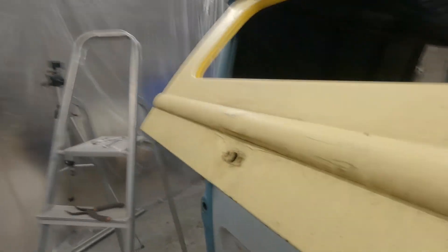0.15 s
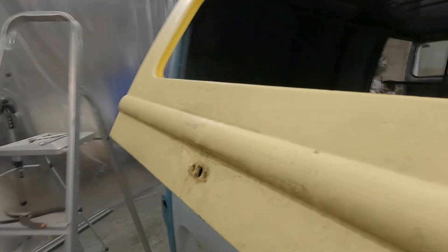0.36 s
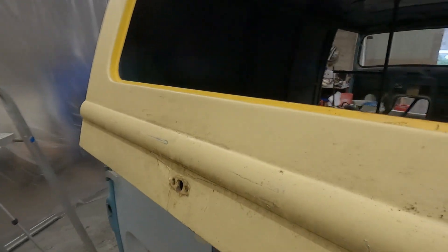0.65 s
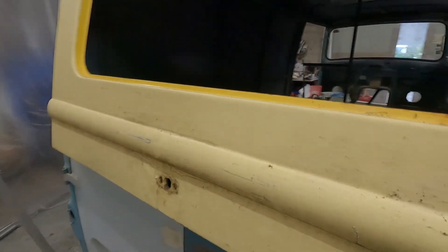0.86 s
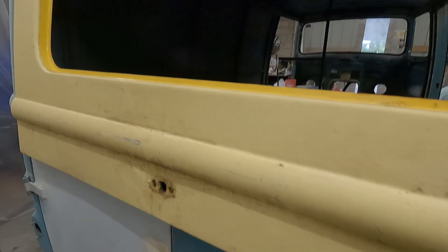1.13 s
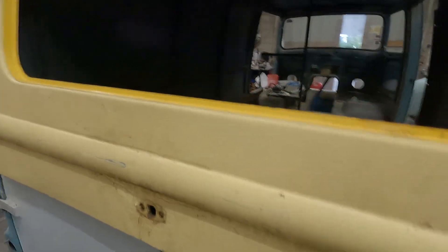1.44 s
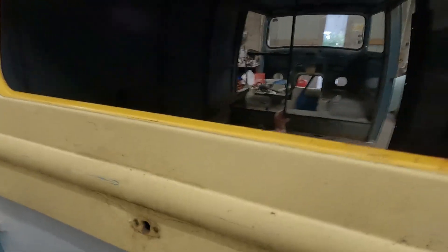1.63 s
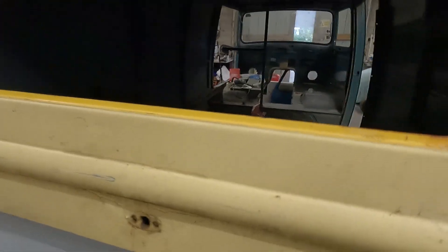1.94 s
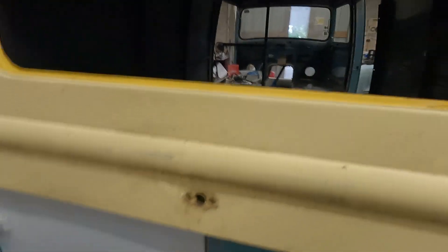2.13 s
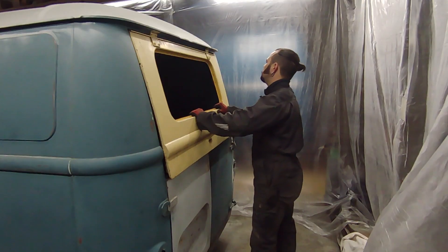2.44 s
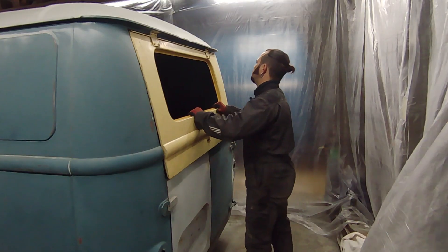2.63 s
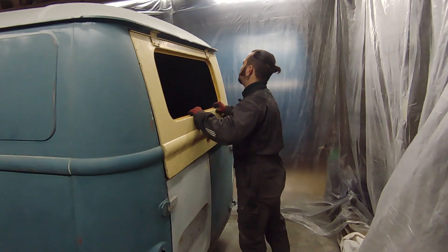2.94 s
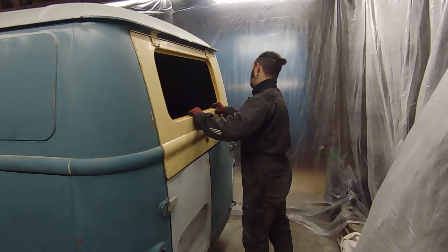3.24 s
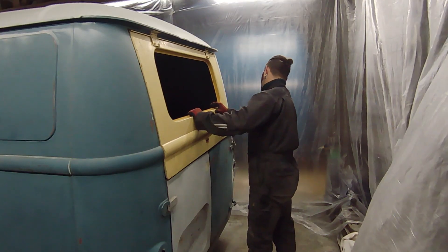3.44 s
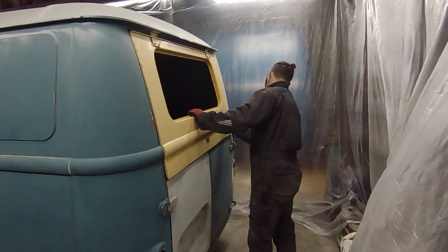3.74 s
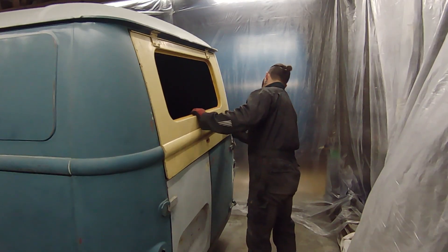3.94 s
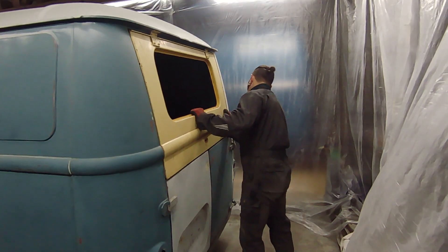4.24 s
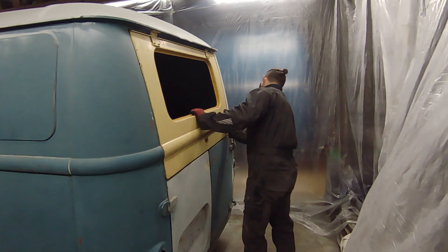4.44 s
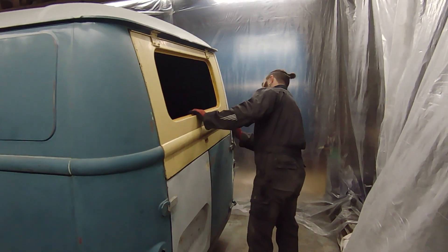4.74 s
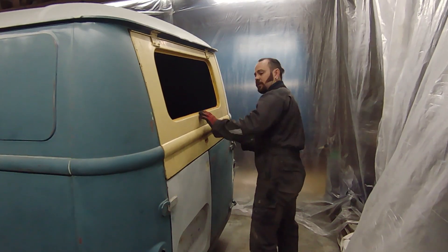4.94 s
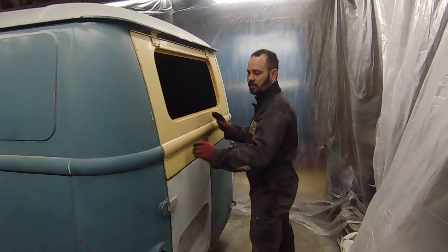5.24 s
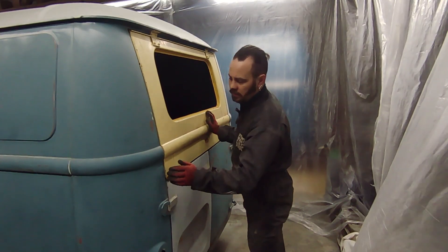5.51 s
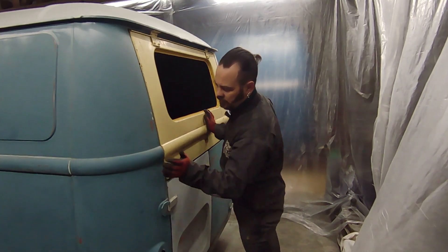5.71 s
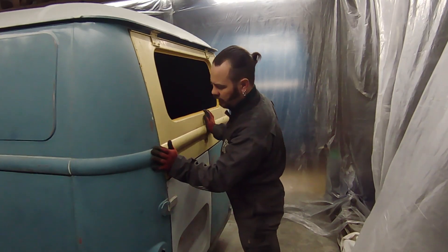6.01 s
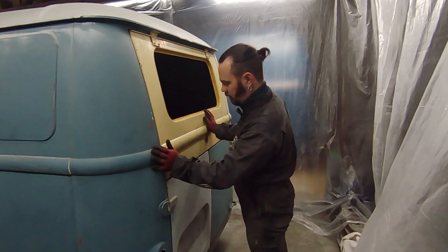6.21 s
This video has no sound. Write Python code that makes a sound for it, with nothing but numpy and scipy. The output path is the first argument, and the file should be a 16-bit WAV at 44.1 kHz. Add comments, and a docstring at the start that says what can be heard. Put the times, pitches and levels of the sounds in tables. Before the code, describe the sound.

Very close, a heavy steel van tailgate rumbles and scrapes downward with uneven sharp metallic clicks, then slams in a quick cluster of bangs and a grating latch, at a hurried pace. After ticks over a thin hiss, the sound cuts abruptly to a more distant microphone in a garage: three separate hollow slams, the second loudest, each booming on over low room tone and soft hiss.

```python
"""A heavy steel van tailgate is pushed shut four times in a garage. The first part is close by and at double pace,
its ring keeping its pitch: the door scrapes down on its stay, clicks, slams, bounces and latches. After a cut
three more slams come from further off. Blows are banded noise plus sheet-metal modes; clicks, latch, scrapes and
room are shaped noise. The camera squeezes loud sounds; in the far part its hiss swells with them."""
import sys
import numpy as np
from scipy import signal
from scipy.fft import rfft, irfft, next_fast_len
from scipy.io import wavfile
from scipy.ndimage import uniform_filter1d, map_coordinates

SR = 44100
rng = np.random.default_rng(int(sys.argv[2]) if len(sys.argv) > 2 else 0)


def elevation(decibels):
    """Turn decibel levels (scalar or array-like) into linear amplitude ratios."""
    levels = np.asarray(decibels, float)
    return 10 ** (levels / 20)


def put_to_file(sound):
    """Save the sound as 16-bit audio at rate SR, in the file named by the first command-line argument."""
    columns = np.atleast_2d(sound).T  # one column per channel
    safe = np.clip(columns, -1, 1)
    whole_steps = np.round(safe * 32767)
    wavfile.write(sys.argv[1], SR, whole_steps.astype(np.int16))


N = 280942
t = np.arange(N) / SR
CUT_S = 2.2315
# door on frame: t/s, blow level/dB, tilt/dB per octave, build-up/s at pace 1, crack/dB re blow
DOOR_BLOWS = [(1.095, -34, -1.5, 0.0019, -7.5), (1.165, -40, 4.5, 0.0068, 1.5),
              (1.19, -26.5, -1.5, 0.017, -13), (1.259, -28.5, 3.5, 0.0025, 15),
              (1.264, -12.5, -1, 0.002, 0.5), (1.308, -16.5, 2, 0.0021, 8), (1.342, -24, -3, .006, 2.5),
              (1.404, -22.5, 1.5, .003, 7), (1.506, -34.5, 0, 0.0037, 10.5),
              (2.582, -63, -6.5, 0.0022, 7.5), (3.052, -30, -0.5, 0.0062, -2),
              (3.072, -18.5, -2, 0.0083, -5.5), (4.256, -32.5, -4, 0.006, -4),
              (4.272, -18.5, -0.5, 0.008, -5), (4.288, -8.5, -1.5, 0.019, -1),
              (5.223, -73.5, -5, 0.0029, 7.5), (5.611, -72.5, -1, 0.0034, 14.5),
              (5.862, -27.5, -5.5, 0.007, -3), (5.873, -10.5, -1.5, 0.0076, -4.5)]


def unit(x):
    """Scaled to rms 1."""
    return x / np.sqrt(np.mean(x ** 2, -1, keepdims=True) + 1e-20)


def along(points, hz):
    """(f/Hz, value) points read on a log frequency axis."""
    f, v = np.transpose(points)
    return np.interp(np.log(hz + 1), np.log(f + 1), v)


def wobble(rate_hz):
    """A smooth random curve, rate_hz knots a second."""
    knots = rng.standard_normal(int(N * rate_hz / SR) + 4)
    return map_coordinates(knots, [t * rate_hz])


def filtered(x, response):
    """x times a zero-phase response of frequency, or a complex one."""
    m = next_fast_len(x.shape[-1] + 8192)
    spectrum = rfft(x, m) * response(np.fft.rfftfreq(m, 1 / SR))
    return irfft(spectrum, m)[..., :x.shape[-1]]


def noise(spectrum, size=N):
    """Coloured noise of rms 1."""
    return unit(filtered(rng.standard_normal(size), lambda hz: elevation(along(spectrum, hz))))


def resonant(x, peaks):
    """x through parallel resonances of alternating sign: f/Hz, width/Hz, level/dB."""
    def response(f):
        return sum((-1) ** k * elevation(db) * 1j * f * w / (c * c - f * f + 1j * f * w)
                   for k, (c, w, db) in enumerate(peaks))
    return filtered(x, response)


def add(out, start_s, x):
    """Mix x into out from start_s."""
    part = out[round(start_s * SR):][:len(x)]
    part += x[:len(part)]


def slams(blows, colour, speed, ring_db, deep_db, thin_db, tail_db, clatter_db, bass_cycles):
    """Every blow cracks, then shakes the van in half-octave bands and panel modes until a steep drop-off."""
    # sheet-metal modes: f/Hz, level/dB, t60/s at pace 1
    panel_modes = [(46, -8.5, 2.5), (111.4, -2, 1.8), (163.8, -4.5, 1.2), (189.5, -3, 1.3),
                   (266.8, -3, 1.25), (339, -1.5, 0.45), (478, -7, 0.48), (547.6, -6, 0.61),
                   (586.3, 0.5, 0.66), (734, -6, .9), (880, -7.5, 0.71), (1008, -12.5, 0.83),
                   (1117, -12, 0.3), (1172, -8.5, 1.0), (1333, -13, .9), (1557, -13.5, 1.2),
                   (1757, -15.5, 1.3), (2050, -18.5, 0.7), (3670, -31, 0.62), (5420, -25, 0.41)]
    # each band drops away ever more steeply: f/Hz, time to fall 20 dB/s at pace 1
    drop_times = [(40, .9), (150, 1), (350, 0.66), (1000, 0.41), (6000, 0.47)]
    # van and garage: f/Hz, t60/s at pace 1
    decay_times = [(40, 1.2), (100, 1.36), (250, 0.93), (600, 0.94), (1500, 1.035), (4000, 0.86),
                   (5500, 0.7), (7500, 0.64), (12000, 0.81)]
    out = np.zeros(N)
    u = np.arange(int(1.8 * SR / speed)) / SR * speed  # event time, runs at speed
    centre_hz = 30 * 2 ** (np.arange(19)[:, None] / 2)  # at pace 1; heard at centre_hz * speed

    def band(hz):
        octaves = np.log2((hz + 1) / speed / centre_hz)
        return np.cos(np.pi * np.clip(octaves, -.5, .5)) ** 2

    def drop_off(f):
        return elevation(-20 * (u / along(drop_times, f)) ** 3.53)

    mode_hz, mode_db, t60_s = np.transpose(panel_modes)[..., None]
    # deepest and thinnest modes carry differently to each microphone
    mode_db = mode_db + deep_db * (mode_hz < 130) + thin_db * (mode_hz > 3000)
    # a weak tail follows the same fade at lower level
    fading = (drop_off(centre_hz) + elevation(tail_db)) * elevation(-60 * u / along(decay_times, centre_hz))
    for start_s, db, tilt_db, rise_s, crack_db in blows:
        shake = filtered(noise(colour, size=len(u)), band)
        swell = 1 - np.exp(-u / (rise_s + bass_cycles / centre_hz))  # bass needs cycles to build up
        crack = elevation(crack_db - 60 * u / 0.066) * (1 - np.exp(-u * centre_hz))
        shake *= (swell * fading + crack) * elevation(tilt_db * np.log2(centre_hz / 500))
        detune, phase, level_draw = rng.standard_normal((3, len(mode_hz), 1))
        # wandering phase blurs each line
        flutter = np.cumsum(rng.standard_normal((len(mode_hz), len(u))), 1) * (0.0017 + mode_hz / 130000.0)
        # u / speed is true time: the pitch stays
        ring = np.sin(2 * np.pi * mode_hz * (1 + .004 * detune) * u / speed + phase + flutter)
        ring *= elevation(mode_db + 3 * level_draw - 60 * u / t60_s) * drop_off(mode_hz)
        ring_sum = elevation(ring_db) * (1 - np.exp(-u / rise_s)) * ring.sum(0)
        clatter = elevation(clatter_db * wobble(70 * speed)[:len(u)])  # loose parts beat unevenly
        add(out, start_s, elevation(db) * clatter * (shake.sum(0) + ring_sum))
    return out


def clicks():
    """Sharp ticks of stay, hinge and latch with a short wash, each thudding in the hollow door."""
    click_rows = [(0.0306, -31, -2, 0.15, 1.5), (0.167, -28.5, -2, 0.2, -2.5),
                  (0.3926, -19.5, -3.5, 0.11, 6.5), (0.4263, -30, 3, 0.15, -4),
                  (0.4714, -37.5, 19.5, 0.088, -2), (0.5014, -16, 5, 0.126, 0), (0.56, -28, -1.5, 0.27, -6),
                  (0.7166, -31.5, 0, 0.065, 1.5), (0.818, -31.5, -21, 0.17, -7),
                  (0.9732, -30.5, -12, 0.24, -4.5), (1.648, -41, -16, 0.055, -1.5),
                  (1.695, -34, -15, 0.045, -1.5), (2.1869, -30.5, -4, 0.3, -3.5),
                  (2.2162, -24.5, -3.5, 0.14, -3)]
    # click colour: f/Hz, relative level/dB
    tick_colour = [(530, -4.5), (900, -3.5), (2320, 0.5), (3020, -4.5), (3710, 0.5), (4450, -8.5),
                   (4940, -4.5), (8250, -20.5), (9150, -33.5), (11400, -23.5), (13800, -36.5)]
    # hollow door: f/Hz, width/Hz, level/dB
    door_peaks = [(264, 15, 0), (860, 6.8, -9.5), (1090, 220, -21.5)]
    out, u = np.zeros(N), t[:SR // 3]
    for start_s, db, thud_db, t60_s, tilt_db in click_rows:
        fade = elevation(-60 * u / t60_s) + .5 * elevation(-60 * u / 0.0079)
        slope_db = np.clip(tilt_db, -6, 6)
        tick = filtered(noise(tick_colour, size=len(u)), lambda hz: elevation(slope_db * np.log2((hz + 600) / 3000)))
        push = unit(resonant(rng.standard_normal(len(u)), door_peaks))
        thud = elevation(db + thud_db - 3.5 - 60 * u / 0.14) * (1 - np.exp(-u / 0.022)) * push
        add(out, start_s, elevation(db - 9.0) * fade * tick + thud)
    return out


def latch():
    """The catch grates over its plate in short noise bursts, each with a low sine knock."""
    # t/s, level/dB before the grate trim, time scale/s, knock/dB re level
    latch_rows = [(1.642, -14.5, 0.01, -24.5), (1.66, -12.5, 0.0052, 1.5), (1.673, -12, 0.018, -6.5),
                  (1.706, -38, 0.012, -2.5), (1.716, -18.5, 0.013, -5)]
    # latch plate: f/Hz, width/Hz, level/dB
    plate_peaks = [(443, 25.3, 10), (867, 41, 7), (1080, 9.5, 5.5), (1410, 83, -2), (2760, 210, -20)]
    out, u = np.zeros(N), t[:SR // 10]
    for start_s, db, length_s, knock_db in latch_rows:
        grate = unit(resonant(rng.standard_normal(len(u)), plate_peaks))
        burst = u / length_s * np.exp(1 - (u / length_s) ** 2) / 2
        add(out, start_s, elevation(db - 11.0) * burst * grate)
        add(out, start_s, elevation(db + knock_db - 60 * u / 0.013) * np.sin(2 * np.pi * 270 * u))
    return out


def lowering():
    """The door rumbles and scrapes unevenly on its way down; a steadier hiss is left when it rests."""
    # door rumble: t/s, level/dB
    rumble_levels = [(0.0, -41.5), (0.29, -45), (0.42, -38), (0.58, -36.5), (0.92, -44.5), (1.24, -39.5),
                     (1.6, -39), (1.7, -43), (2.1, -50)]
    # rumble colour: f/Hz, relative level/dB
    rumble_colour = [(15, -47.5), (25, -9.5), (113, -10), (162, 1), (209, -2), (444, -6.5), (484, -9),
                     (575, -4), (756, -10), (1500, -26), (1950, -50), (3300, -120)]
    # moving door: f/Hz, relative level/dB
    scrape_colour = [(470, -41.5), (800, -14), (1080, -1), (1200, -9.5), (1320, -6.5), (1690, -8),
                     (3380, -9), (6910, -25.5), (9090, -40.5), (11500, -27.5), (13800, -47.5)]
    # hiss at rest: f/Hz, relative level/dB
    rest_colour = [(470, -29), (800, -11.5), (1600, -9.5), (2730, -3), (2930, -1.5), (3230, 1.5),
                   (5260, -18), (7000, -21), (9310, -43), (11500, -25), (13800, -59.5)]
    scrape_db, rest_db, rest_s, come_to_rest_s = -47, -54, 1.55, 0.072
    rumble_db = np.interp(t, *np.transpose(rumble_levels))
    jolt = wobble(22)  # shared by rumble and scrape
    resting = np.clip((t - rest_s) / come_to_rest_s, 0, 1)
    rumble = elevation(rumble_db + 0.88 * jolt + 1.5 * wobble(40)) * noise(rumble_colour)
    scrape = (1 - resting) * elevation(scrape_db + 2.1 * jolt + wobble(45)) * noise(scrape_colour)
    rest = resting * elevation(rest_db + 1.5 * wobble(5.7)) * noise(rest_colour)
    return rumble + scrape + rest


def sizzles():
    """Brief narrow-band sizzles and squeaks: doubly resonant noise that swells quickly and fades, unevenly."""
    # t/s, length/s, f/Hz, width of each resonance pass/Hz, level/dB
    sizzle_rows = [(1.527, 0.0083, 11850, 1504, -49), (2.0, .2, 6900, 495, -69),
                   (3.171, 0.2, 5420, 220, -58.5), (3.54, 0.075, 1730, 60, -68), (5.61, .05, 900, 300, -68),
                   (4.36, .28, 5790, 301, -54), (5.9, .3, 5200, 250, -59)]
    out = np.zeros(N)
    for start_s, length_s, hz, width_hz, db in sizzle_rows:
        u = t[:int(length_s * SR)] / length_s
        peak = [(hz, width_hz, 0)]
        buzz = unit(resonant(resonant(rng.standard_normal(len(u)), peak), peak))
        add(out, start_s, elevation(db + 3.4 * wobble(60)[:len(u)]) * np.sin(np.pi * u ** .6) * buzz)
    return out


def garage():
    """The garage booms on after each far blow; the loose door hums, drones and scuffs as it is pulled and shifted."""
    # door handled: t/s, held/s, hollow hum/dB, drone/dB re hum, scuff/dB re hum
    handling_rows = [(2.2, 0.19, -62.5, -4, -13.5), (2.585, 0.45, -65.5, 5, -5),
                     (3.52, .14, -54.5, -1, -12.5), (3.8, 0.077, -62, 1.5, -12.5),
                     (3.99, 0.071, -71, 2, -7.5), (5.222, 0.061, -69.5, -2, -7.5),
                     (5.611, 0.15, -74.5, -4, -1.5)]
    # hum colour: f/Hz, relative level/dB
    hum_colour = [(240, -42), (400, -14.5), (481, -6.5), (615, 3), (796, -7.5), (877, -20.5), (950, -22),
                  (1240, -47), (2090, -120)]
    # drone and boom colour: f/Hz, relative level/dB
    drone_colour = [(12, -48), (20, -15.5), (43, 3.5), (118, 6.5), (151, 2.5), (365, -3), (450, -13.5),
                    (580, -35.5), (990, -120)]
    # scuff colour: f/Hz, relative level/dB
    scuff_colour = [(500, -33.5), (850, -1), (1350, -4.5), (1600, -10), (1870, -15.5), (2780, -20),
                    (3500, -18), (4550, -47.5), (7700, -120)]
    grip_s, let_go_t60_s = 0.015, .6
    boom_db, boom_rise_s, boom_t60_s = -16, 0.42, 1.316  # boom_db re blow
    start_s, held_s, hum_db, drone_db, scuff_db = np.transpose(handling_rows)[..., None]
    onset = 1 - np.exp(-np.clip(t - start_s, 0, None) / grip_s)
    grip = onset * elevation(hum_db - 60 * np.clip(t - start_s - held_s, 0, None) / let_go_t60_s)
    hit_s, blow_db = np.transpose([b[:2] for b in DOOR_BLOWS if b[0] > CUT_S])[..., None]
    after_s = np.clip(t - hit_s, 0, None)
    boom = (1 - np.exp(-after_s / boom_rise_s)) * elevation(blow_db + boom_db - 60 * after_s / boom_t60_s)
    hum = grip.sum(0) * elevation(1.2 * wobble(26)) * noise(hum_colour)
    drone_level = (grip * elevation(drone_db)).sum(0) + boom.sum(0)
    drone = drone_level * elevation(1.5 * wobble(3.2)) * noise(drone_colour)
    scuff = (grip * elevation(scuff_db)).sum(0) * elevation(1.3 * wobble(13)) * noise(scuff_colour)
    return hum + drone + scuff


def room_tone():
    """Steady, mostly low coloured noise of the garage."""
    # f/Hz, relative level/dB
    room_colour = [(15, -31), (25, -3.5), (104, 1.5), (204, -3.5), (306, -16.5), (495, -13.5), (674, -4.5),
                   (883, -16.5), (2500, -29.5), (3250, -57), (5500, -120)]
    return elevation(-71.5) * noise(room_colour)


def scene():
    """The close, sped-up part up to the cut, then the far part."""
    # blow close by: f/Hz, relative level/dB
    near_colour = [(18, -70), (30, -25.5), (70, -6.5), (216, 0), (302, 2), (335, -11), (467, -0.5),
                   (619, -9), (864, -6), (1180, -12.5), (2020, -14.5), (6560, -32), (9150, -56.5),
                   (11500, -45.5), (13800, -67)]
    # blow from afar: f/Hz, relative level/dB
    far_colour = [(15, -48), (25, -17.5), (99, -2.5), (140, -5.5), (274, -3), (313, -5), (598, -4),
                  (826, -8.5), (1140, -9), (1950, -20), (3720, -26.5), (4380, -31.5), (5430, -28.5),
                  (6920, -43.5), (15500, -58.5)]
    near = slams([b for b in DOOR_BLOWS if b[0] < CUT_S], near_colour, speed=2, ring_db=-9.5, deep_db=-14.5,
                 thin_db=-2.5, tail_db=-14.5, clatter_db=1.1, bass_cycles=3.6)
    near += clicks() + latch() + lowering()
    # microphone notch and upper edge
    near = filtered(near, lambda hz: (1 - .8 * np.exp(-((hz - 9100) / 150) ** 2)) / (1 + (hz / 13300) ** 40))
    far = slams([b for b in DOOR_BLOWS if b[0] > CUT_S], far_colour, speed=0.94, ring_db=-11.5, deep_db=1.5,
                thin_db=2.0, tail_db=-17, clatter_db=0.43, bass_cycles=2.9)
    far += garage() + room_tone()
    return np.where(t < CUT_S, near, far)[None] + sizzles()


def low_pass(x):
    """Removes everything above the highest recorded frequency."""
    return signal.sosfilt(signal.butter(12, 15800, fs=SR, output="sos"), x)


def record(dry):
    """Gain control turns loud passages down; in the far part the hiss rides on the loudness."""
    # f/Hz, relative level/dB
    hiss_colour = [(300, -1), (2000, 0), (8000, -2), (15000, -3.5)]
    dry = filtered(dry, lambda hz: hz ** 2 / (hz ** 2 + 25 ** 2))  # the microphone drops the deepest bass
    width = int(0.02 * SR)
    power = uniform_filter1d(dry ** 2, width, origin=(width - 1) // 2)  # looks back only
    loud_db = 10 * np.log10(np.abs(power) + 1e-9)
    gain_db = -.25 * np.logaddexp(0, (loud_db + 24.0) / 3) * 3  # soft knee at -24 dB
    slow_db = uniform_filter1d(loud_db + gain_db, int(.12 * SR))
    hiss = elevation(-57.0 + 0.24 * np.minimum(slow_db, -30)) * noise(hiss_colour) * (t > CUT_S)
    squeezed = dry * elevation(gain_db + 1)
    # the capsule favours pushes over pulls
    squeezed = filtered(squeezed + 0.067 * squeezed ** 2, lambda hz: hz > 20)
    return low_pass(squeezed + hiss)


dry = scene()
out = record(dry)
put_to_file(out)
```